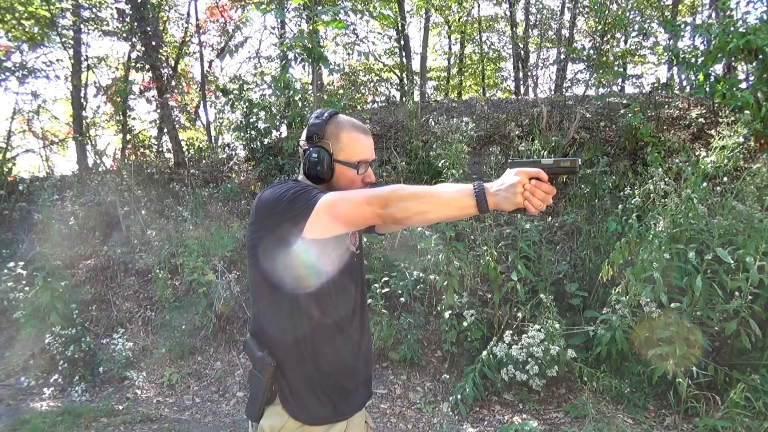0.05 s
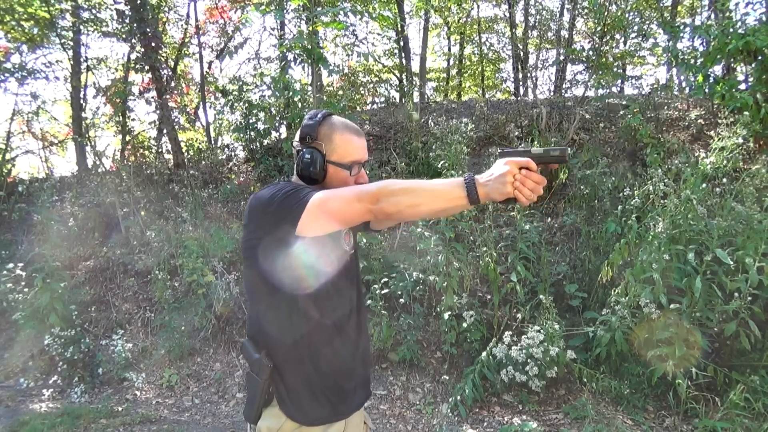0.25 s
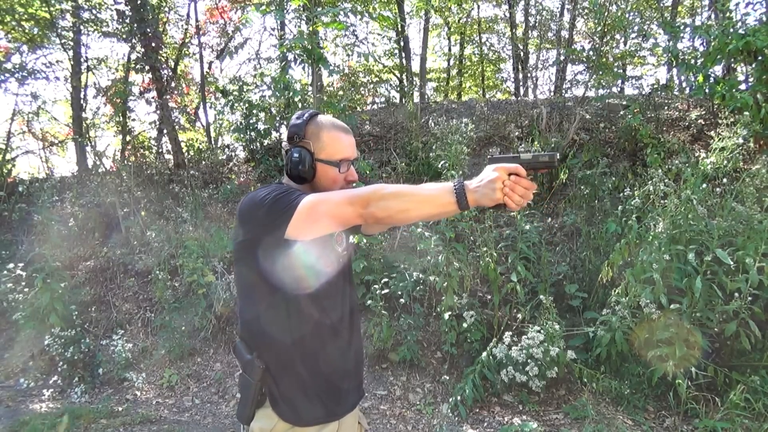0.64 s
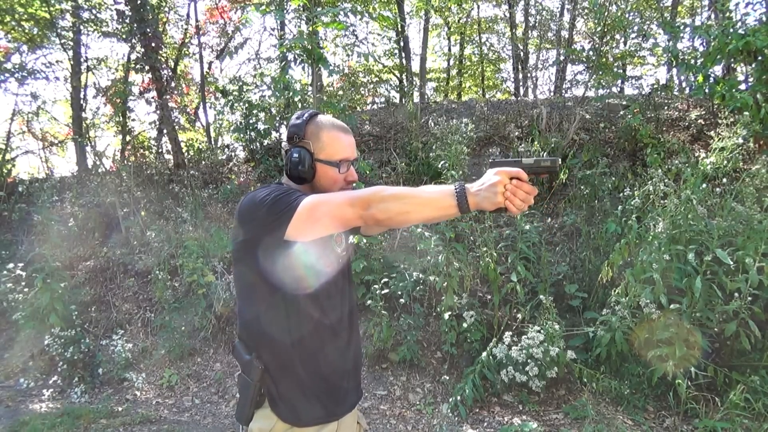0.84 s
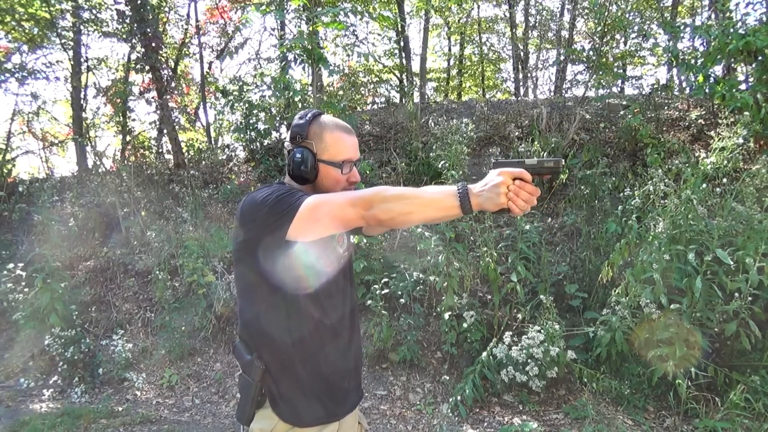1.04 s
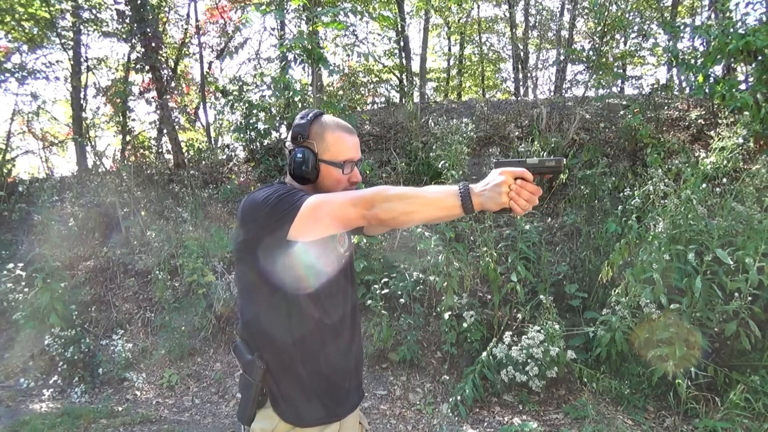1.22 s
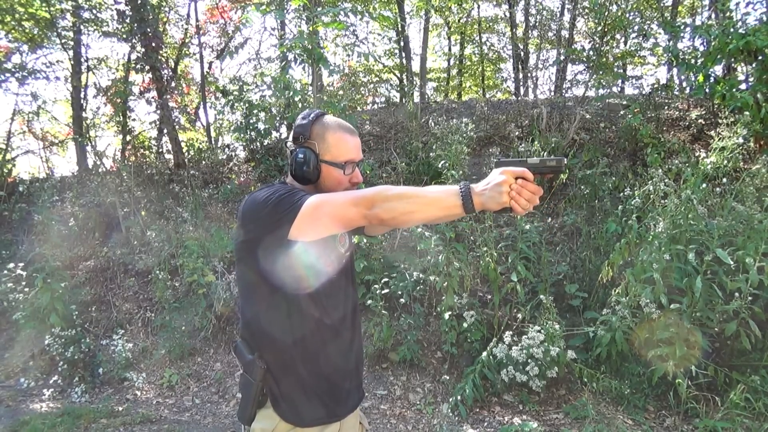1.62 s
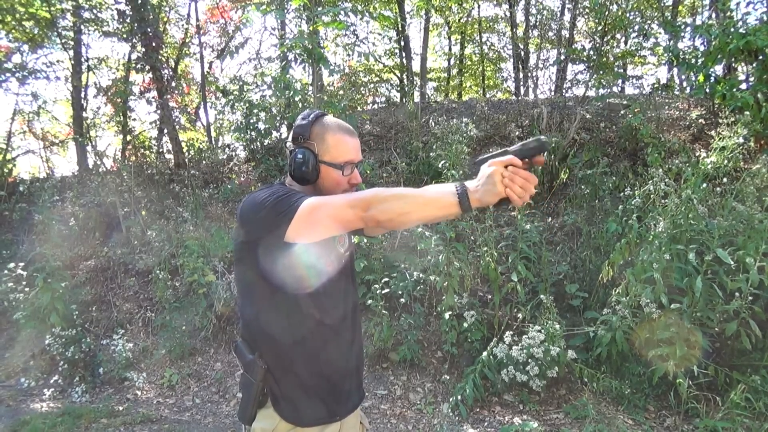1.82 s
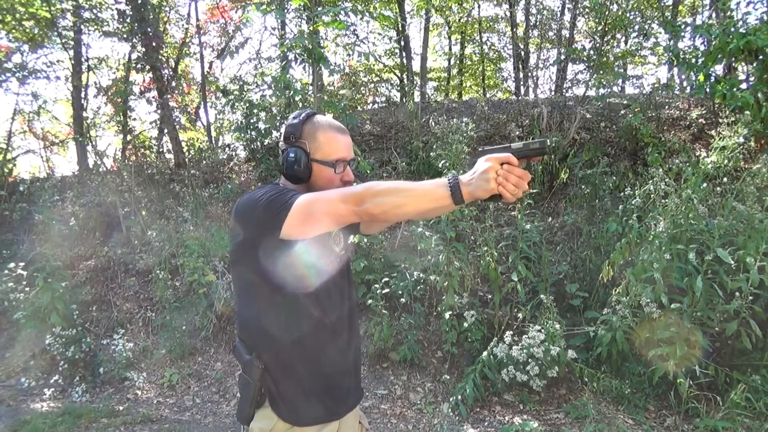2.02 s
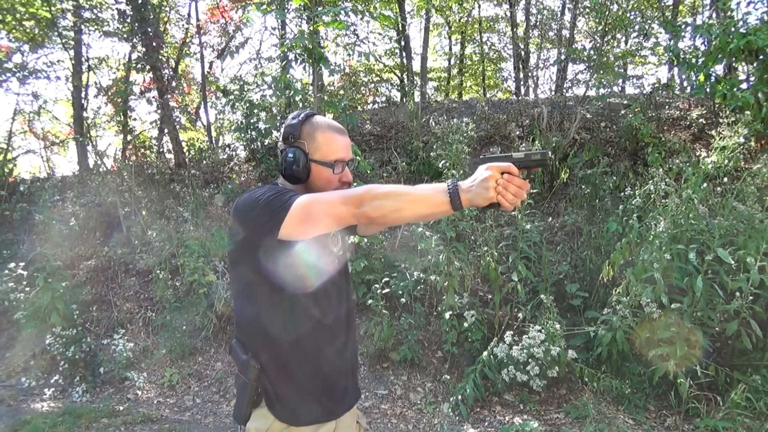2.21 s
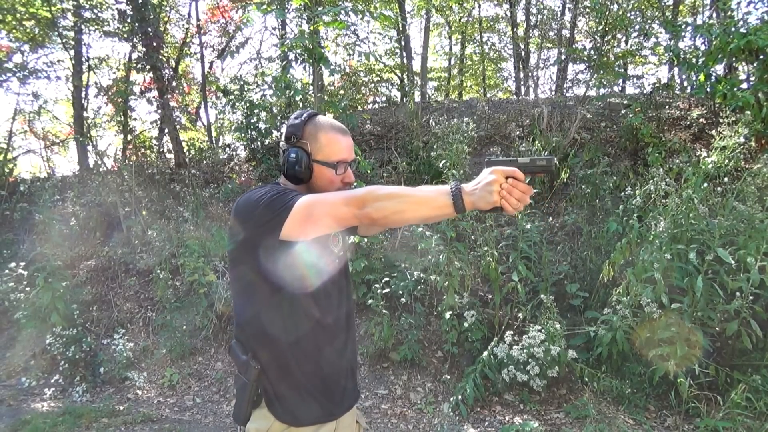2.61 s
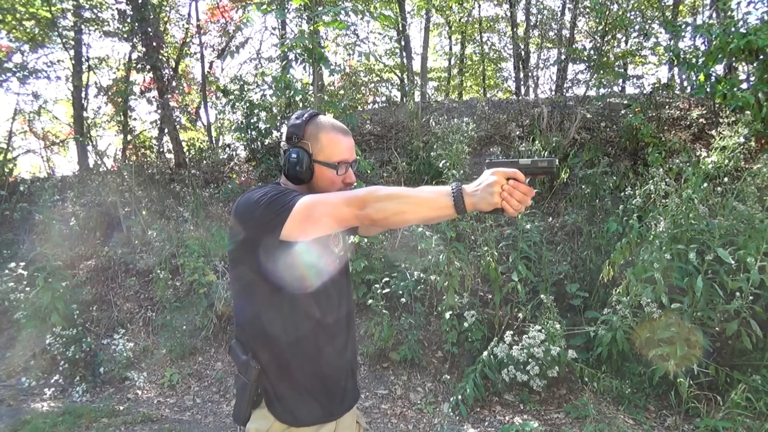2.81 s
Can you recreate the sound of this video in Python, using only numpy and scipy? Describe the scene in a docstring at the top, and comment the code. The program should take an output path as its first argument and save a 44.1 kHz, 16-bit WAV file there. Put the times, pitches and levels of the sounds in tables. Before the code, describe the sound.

A pistol fires twice outdoors, with echoing blasts, steel target clangs and small casing clinks.

```python
"""Wooded outdoor range, beside the shooter: two pistol shots.
Each blast overloads the recorder, whose limiter holds the forest's roar flat before it dies away.
Each bullet rings a steel plate. After each shot the trigger resets with a click and the brass case
bounces on gravel. Insects sing in the undergrowth; wind rumbles faintly on the microphones."""
import sys
import numpy as np
from scipy import signal
from scipy.io import wavfile

SR = 44100
rng = np.random.default_rng(int(sys.argv[2]) if len(sys.argv) > 2 else 0)


def wrap_up_sound(samples):
    """Save the sound to the file named by the first command line argument, as 16-bit audio."""
    columns = np.atleast_2d(samples).T
    # keep every value between -1 and 1, then stretch to whole-number steps
    tamed = np.clip(columns, -1, 1)
    steps = np.round(tamed * 32767).astype(np.int16)
    wavfile.write(sys.argv[1], SR, steps)


N = 130095
T = np.arange(N) / SR

# shots: (time [s], relative level [dB], echo decay speed [ratio])
SHOTS = [(0.2079, 0.5, 1.015), (1.8644, -0.17, 1.03)]
# blast gas and its near scatter: (frequency [Hz], relative density [dB])
BLAST_SPECTRUM = [(40, -7), (110, -23), (250, -1), (500, 0.5), (950, 2.5), (1400, -5), (2500, -6.5),
                  (6000, -10.5), (11000, -9.5), (15500, -25.5)]
# blast and echoes: (frequency [Hz], left-right correlation [-1..1])
BLAST_CORRELATION = [(40, -.85), (120, .2), (300, .7), (700, .84), (1200, .87), (2500, .95), (5000, .86),
                     (9000, .87), (12000, .95)]
def blasts():
    """A crack of gas and a boom, repeated by the ground, and a wide low thump."""
    ground_delay_s, ground_db, boom_lag_s = .0068, 2, .00176
    gas = rms_one(noise(BLAST_SPECTRUM, BLAST_CORRELATION, lambda hz: hz / (hz + 900)))
    out = 0
    for s, db, _ in SHOTS:
        for start, level_db in (s, db), (s + ground_delay_s, db + ground_db):
            crack = from_db(10.5) * burst(start, length_s=.0018) * gas
            boom = from_db(21) * ring(start + boom_lag_s, hz=653, t60_s=.0067)
            out += from_db(level_db) * (crack + boom)
        swell = 3.5 - fall(s + boom_lag_s, db_per_s=900)
        thump = swell * ring(s + boom_lag_s, hz=139, t60_s=.045)
        out += from_db(db - 3) * thump * [[-.4], [1]]
    return out


# forest roar: (frequency [Hz], relative density [dB], base decay [dB/s], left over right [dB])
FOREST_BANDS = [(60, -40, 45, -9), (160, -31.5, 67, -9), (282, -13.5, 61.5, -9.5), (485, -1.5, 44, -7),
                (853, 1, 53.5, -3.5), (1260, -2, 59.5, -5), (1850, 2.5, 65, -3.5), (4280, -1.5, 74.5, -4),
                (6470, -5, 81, 6.5), (10300, -7, 107.5, 3), (15300, -16, 148, -12)]
# dull rumble from far trees: (frequency [Hz], relative density [dB])
FAR_SPECTRUM = [(100, -26), (300, -9), (550, 3.5), (1000, -0.5), (2000, -5.5), (5000, -22.5), (12000, -87)]
def echoes():
    """Berm, bushes, forest and far trees scatter each blast; treble dies first, a low tone rings on."""
    def decay(db_per_s):
        return sum(from_db(db) * fall(s, db_per_s * speed) for s, db, speed in SHOTS)

    def through_trees(hz):
        flicker = from_db(clumps_db + 1.4 * drift(rate_hz=31))
        return decay(at_hz(FOREST_BANDS, hz, column=2)) * pan(at_hz(FOREST_BANDS, hz, column=3)) * flicker

    clumps_db = .5 * drift(rate_hz=13)
    near = from_db(14.5) * decay(db_per_s=140.5) * noise(BLAST_SPECTRUM, BLAST_CORRELATION)
    near *= pan(-6.5) * from_db(1.6 * drift(rate_hz=76))
    far = from_db(-31) * decay(db_per_s=23.5) * noise(FAR_SPECTRUM, BLAST_CORRELATION)
    drone = from_db(-14.5) * pan(-20.5) * sum(ring(s, hz=364.5, t60_s=1.35) for s, *_ in SHOTS)
    forest = from_db(7.5) * noise(FOREST_BANDS, BLAST_CORRELATION, through_trees)
    return near + butter(forest, "low", hz=12200, order=6) + far + drone


# steel plate modes, one table per plate: (frequency [Hz], relative level [dB])
FIRST_PLATE_MODES = [(1717, -41), (2955, -37), (3079, -36), (3235, -37), (3865, -45), (4043, -36),
                     (4457, -42), (6191, -43), (6578, -51), (7224, -45), (7413, -49), (8516, -53)]
SECOND_PLATE_MODES = [(1863, -32), (2573, -39), (3413, -43), (3876, -44), (4350, -44), (4549, -35),
                      (4646, -40), (4936, -42), (5324, -44), (5652, -47), (6621, -51), (8199, -53),
                      (8516, -49)]
def plate(shot_s, modes, gain_db, pan_db):
    """A bullet clanks on steel downrange; each mode wavers on its way through the trees."""
    arrival_s = shot_s + .172
    out = from_db(-9) * fall(arrival_s, db_per_s=335) * band_noise(hz=3866, width_hz=210)
    for hz, db in modes:
        t60_s = .89 * (hz / 3000) ** -.032
        waver = 1 + .35 * drift(rate_hz=7.9)
        out += from_db(db + gain_db) * ring(arrival_s, hz, t60_s) * waver
    return out * pan(pan_db)


# trigger resets: (time [s], level [dB])
RESETS = [(1.0663, -12.5), (2.6607, -12.5)]
# reset click: (frequency [Hz], relative density [dB])
RESET_SPECTRUM = [(300, -35), (1100, -18), (1600, 0), (3000, -16), (4800, 3), (7500, -5), (10500, 2.5),
                  (13000, -14), (16000, -14)]
def trigger():
    """A hard snap, its echo off the ground and a faint scatter from the bushes."""
    envelope = 0
    for s, db in RESETS:
        snap = burst(s, length_s=.00082) + from_db(-11.5) * fall(s, db_per_s=3200)
        ground = from_db(-12.5) * fall(s + .005, db_per_s=5500)
        bushes = from_db(-32.5) * fall(s, db_per_s=228)
        envelope += from_db(db) * (snap + ground + bushes)
    clicks = envelope * noise(RESET_SPECTRUM, correlation=[(300, 1), (12000, .9)])
    return butter(clicks, "high", hz=1430, order=4)


# case bounces: (time [s], tick level [dB], ping level [dB], ping frequency [Hz])
BOUNCES = [(0.9655, -28, -49, 8818), (0.9710, -48, -29.5, 8840), (0.9881, -31.5, -35, 8700),
           (1.168, -42, -41, 8770), (1.247, -45, -70, 8818), (1.335, -62, -48, 8818),
           (1.415, -66, -54, 8818), (2.6791, -37, -22.5, 8750), (2.851, -47, -34, 8722)]
# gravel tick, first landing's knock: (frequency [Hz], relative density [dB])
TICK_SPECTRUM = [(200, -1), (1000, -5), (3200, 2.5), (6000, -6.5), (10500, 5.5), (15500, -24)]
KNOCK_SPECTRUM = [(150, -11), (300, 3), (1200, -15), (2400, -1), (3400, 6), (4500, -9), (12000, -30)]
def cases():
    """Brass ticks on gravel and pings; the ping drops quickly to a thin after-ring."""
    grit = noise(TICK_SPECTRUM, correlation=[(300, .93), (12000, .81)])
    out = 0
    for s, tick_db, ping_db, hz in BOUNCES:
        tick = fall(s, db_per_s=3000) * grit
        ping = ring(s, hz, t60_s=.038) + from_db(-20) * ring(s, hz, t60_s=.31)
        out += from_db(tick_db) * tick + from_db(ping_db) * ping
    knock = fall(start_s=.9662, db_per_s=4000) * noise(KNOCK_SPECTRUM, correlation=[(300, 1), (12000, 1)])
    return (out + from_db(-26) * knock) * pan(9.5)


# cricket pulses: (time [s], level [dB])
CHIRPS = [(0.011, -48.5), (0.055, -43), (0.104, -43), (1.2, -52), (1.246, -49.5), (1.294, -49.5),
          (1.795, -52), (1.84, -41.5)]
def cricket():
    """Short pulses sagging in pitch, echoed by the leaves."""
    start_hz, sag_hz_per_s, pulse_s = 4540, 6500, .023
    pulses = 0
    for s, db in CHIRPS:
        age_s = np.clip(T - s, 0, pulse_s)
        envelope = np.sin(np.pi * age_s / pulse_s) ** 2
        cycles = (start_hz - sag_hz_per_s * age_s / 2) * age_s
        pulses += from_db(db) * envelope * np.sin(2 * np.pi * cycles)
    leaves = rms_one(rng.standard_normal((2, N)) * fall(0, db_per_s=167)) / np.sqrt(N)
    return pulses + from_db(-7) * signal.fftconvolve(pulses[None], leaves)[:, :N]


# insect buzz: (time [s], level [dB])
BUZZ_LEVELS = [(0, -51.5), (.2, -51.5), (1.2, -63), (1.8, -59.5), (2.5, -64.5), (2.95, -62.5)]
def insects():
    """A far tree cricket's trill and a throbbing high buzz."""
    trill = from_db(-71.5) * band_noise(hz=2670, width_hz=145) * (1 + sine(hz=26))
    throb = 1 + .33 * sine(hz=47, phase_rad=drift(rate_hz=2.7))
    return trill + band_noise(hz=7030, width_hz=700) * throb * fader(BUZZ_LEVELS)


# wind rumble: (time [s], level [dB])
WIND_LEVELS = [(0, -49), (.15, -54), (.7, -61), (1.1, -60), (1.8, -62), (2.3, -73), (2.95, -72)]
# wind rumble: (frequency [Hz], relative density [dB])
WIND_SPECTRUM = [(25, -5), (55, 5), (100, -2), (160, -15), (300, -16), (1000, -72)]
def wind():
    """Wind rumbles on the microphones."""
    return fader(WIND_LEVELS) * noise(WIND_SPECTRUM, correlation=[(40, .15), (150, .69)])


# still air: (frequency [Hz], relative density [dB])
AIR_SPECTRUM = [(30, -2), (200, -11), (600, -10.5), (1500, -17), (4500, -21.5), (9000, -25), (15500, -27)]
def air():
    """A steady hush with a faint high whine."""
    hush = noise(AIR_SPECTRUM, correlation=[(120, .2), (400, .77), (3000, 1), (12000, .87)])
    return from_db(-56) * hush + from_db(-63) * sine(hz=15500)


def from_db(db):
    """Decibels to gain."""
    return 10 ** (np.asarray(db) / 20)


def rms_one(x):
    """Scale to unit power."""
    return x / np.sqrt(np.mean(x ** 2) + 1e-20)


def at_hz(table, hz, column=1):
    """Read a table column on a log-frequency axis."""
    rows = np.array(table)
    return np.interp(np.log(hz), np.log(rows[:, 0]), rows[:, column])


def fader(levels):
    """Gain curve through (time [s], level [dB]) points."""
    return from_db(np.interp(T, *np.transpose(levels)))


def pan(db):
    """Constant-power stereo gains, left over right by db."""
    return rms_one(from_db([[db / 2], [-db / 2]]))


def butter(x, kind, hz, order):
    """Butterworth filter."""
    return signal.sosfilt(signal.butter(order, hz, kind, fs=SR, output="sos"), x)


def drift(rate_hz):
    """Smooth random wander, rms 1."""
    hop, warmup = 40, 2000
    pole = np.exp(-2 * np.pi * rate_hz * hop / SR)
    white = rng.standard_normal(N // hop + warmup + 2)
    slow = signal.lfilter([1], [1, -2 * pole, pole * pole], white)[warmup:]
    return np.interp(np.arange(N) / hop, np.arange(len(slow)), rms_one(slow))


def fall(start_s, db_per_s):
    """Envelope: instant rise, exponential decay."""
    return (T >= start_s) * from_db(-np.clip((T - start_s) * db_per_s, 0, 200))


def burst(start_s, length_s):
    """Envelope: brief hold, Gaussian collapse."""
    return (T >= start_s) * np.exp(-np.minimum(np.abs(T - start_s) / length_s, 10) ** 2)


def sine(hz, phase_rad=0):
    """Sine of height 1."""
    return np.sin(2 * np.pi * hz * T + phase_rad)


def ring(start_s, hz, t60_s):
    """Struck mode of height 1."""
    return fall(start_s, 60 / t60_s) * np.sin(2 * np.pi * hz * (T - start_s))


def noise(spectrum, correlation, shape=lambda hz: 1):
    """Half-octave bands of stereo noise, rms 1 in all, each then scaled by shape(hz)."""
    edges_hz = 16500 / 2 ** np.arange(9, -.1, -.5)
    white = rng.standard_normal((2, 2, N))
    out = power = 0
    for k, (low, high) in enumerate(zip(edges_hz, edges_hz[1:])):
        mid, side = rms_one(butter(white[k % 2], "band", [low, high], order=2))
        hz = np.sqrt(low * high)
        alike = np.clip(at_hz(correlation, hz), -1, 1)
        gain = from_db(at_hz(spectrum, hz)) * np.sqrt(high - low)
        band = np.sqrt(1 + alike) * mid + np.sqrt(1 - alike) * side * [[1], [-1]]
        out += gain * shape(hz) * band
        power += 2 * gain ** 2
    return out / np.sqrt(power)


def band_noise(hz, width_hz):
    """Narrow stereo noise, rms 1."""
    white = rng.standard_normal(N) + .5 * rng.standard_normal((2, N))
    return rms_one(butter(white, "band", [hz - width_hz / 2, hz + width_hz / 2], order=2))


def scene():
    """Shots, plates, small metal sounds and the quiet wood."""
    plates = plate(SHOTS[0][0], FIRST_PLATE_MODES, gain_db=19.5, pan_db=-4)
    plates += plate(SHOTS[1][0], SECOND_PLATE_MODES, gain_db=17.5, pan_db=-5)
    background = air() + wind()
    return blasts() + echoes() + plates + trigger() + cases() + cricket() + insects() + background


def mid_side_filter(x):
    """The shared bass is cut and the top treble narrows to mono."""
    mid = butter(x.mean(axis=0), "high", hz=70, order=2)
    side = butter((x[0] - x[1]) / 2, "low", hz=9800, order=8)
    return mid + from_db(-2.5) * side * [[1], [-1]]


def limiter(x):
    """Gain drops fast above the threshold and recovers at a constant dB rate."""
    threshold_db, attack_s, release_db_per_s = -14.5, .006, 198.5
    pole = np.exp(-1 / (attack_s * SR))
    power = signal.lfilter([1 - pole], [1, -pole], np.mean(x ** 2, axis=0))
    excess_db = np.maximum(10 * np.log10(power + 1e-12) - threshold_db, 0)
    release_db = release_db_per_s * T
    cut_db = np.maximum.accumulate(excess_db + release_db) - release_db
    return x * from_db(-cut_db)


def record(dry):
    """Mid-side filter, limiter, soft clip of the overshoot, steep low-pass."""
    ceiling, cutoff_hz = .6, 16000
    clipped = ceiling * np.tanh(limiter(mid_side_filter(dry)) / ceiling)
    return signal.sosfilt(signal.ellip(10, .2, 80, cutoff_hz, fs=SR, output="sos"), clipped)


dry = scene()
out = record(dry)
wrap_up_sound(out)
```